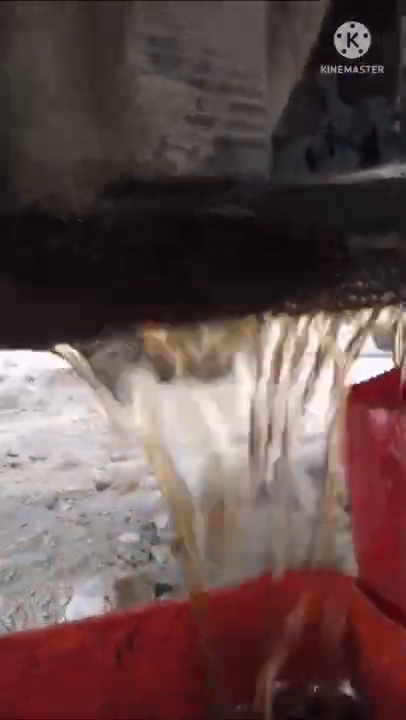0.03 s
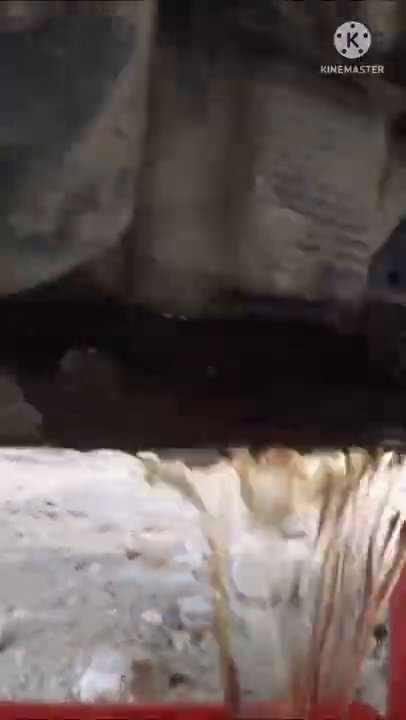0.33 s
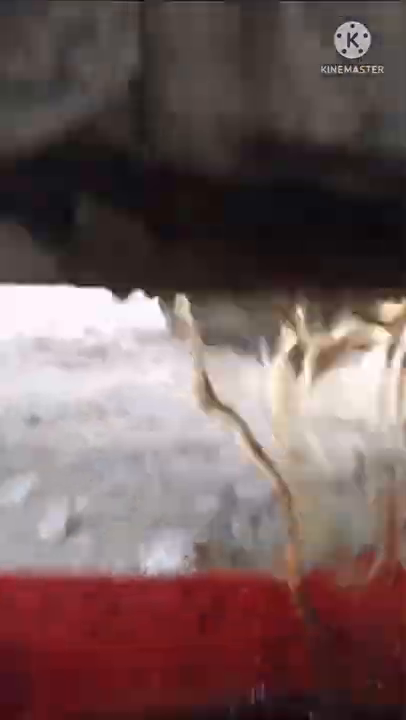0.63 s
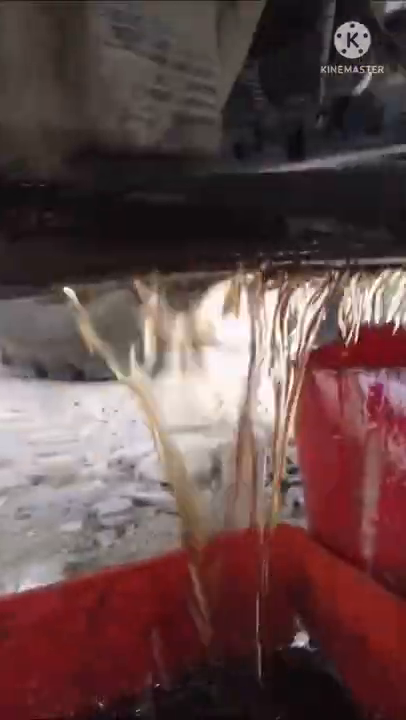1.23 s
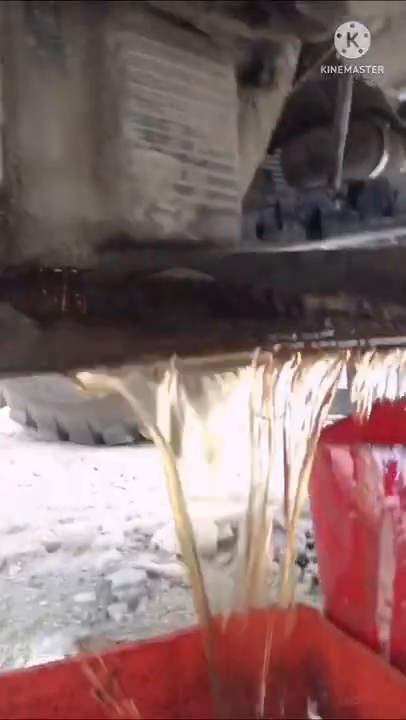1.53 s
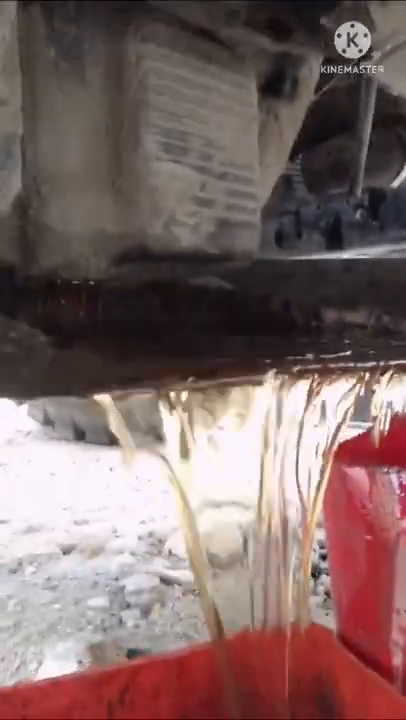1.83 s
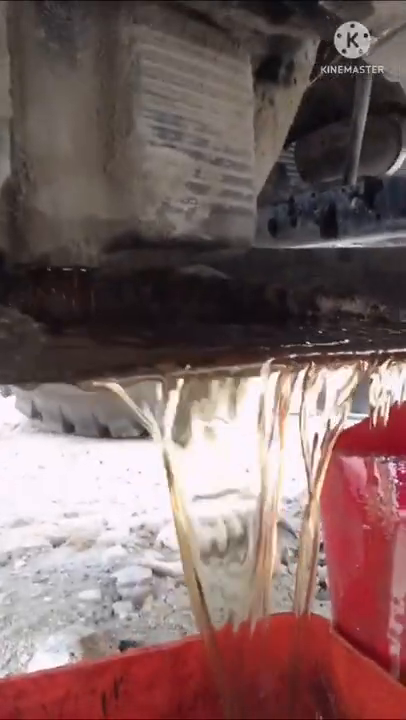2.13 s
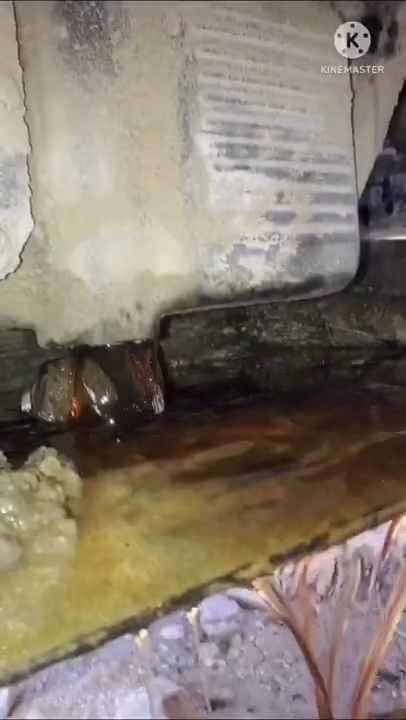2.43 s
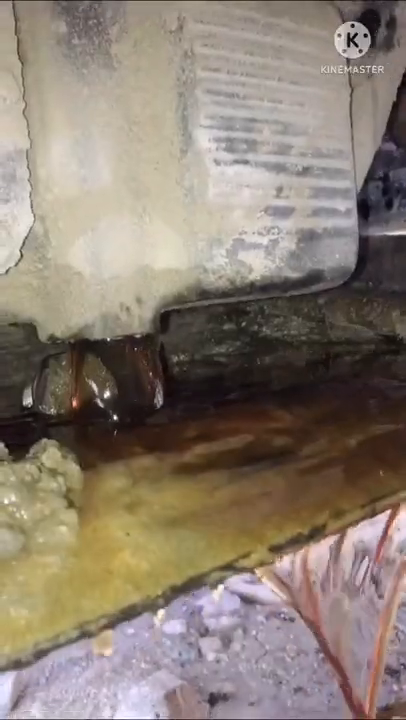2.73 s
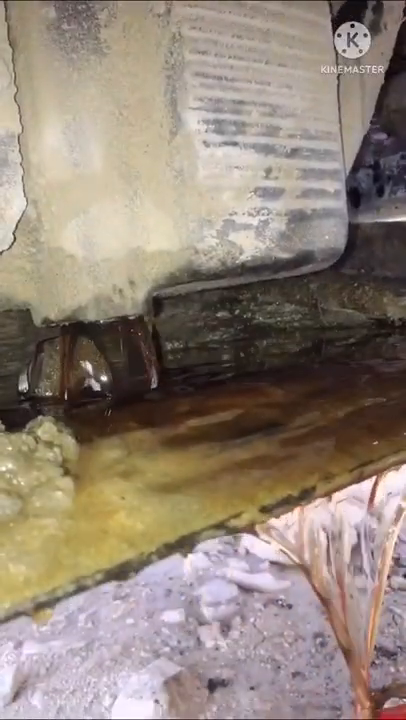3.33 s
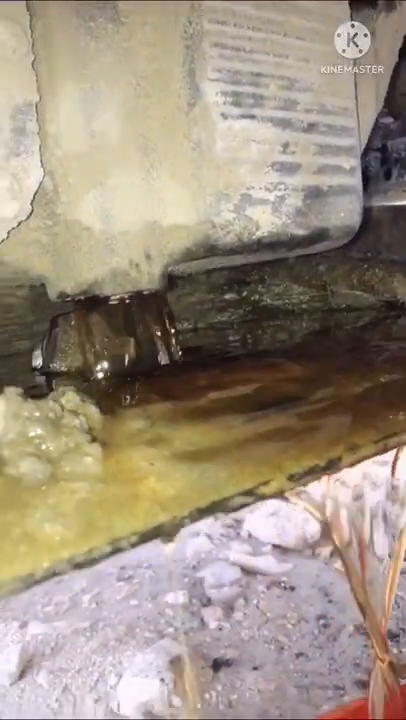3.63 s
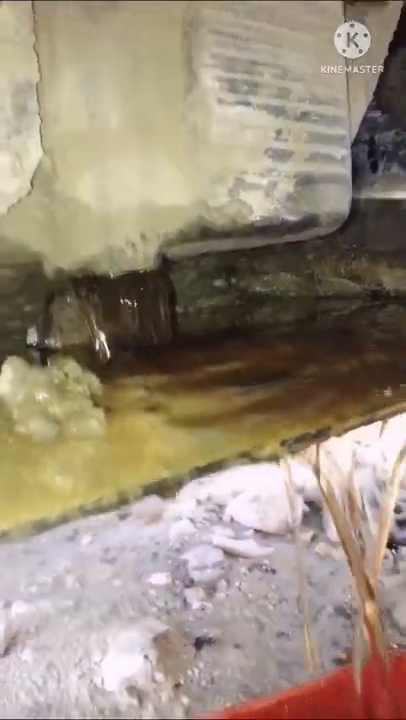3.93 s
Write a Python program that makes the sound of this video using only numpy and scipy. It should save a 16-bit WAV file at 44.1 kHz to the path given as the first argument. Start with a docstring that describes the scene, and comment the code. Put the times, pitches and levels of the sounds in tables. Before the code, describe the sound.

Oil pours into a part-filled plastic tub, gurgling and splattering, strongest in the first second and then gradually thinning until 4 seconds. An engine idles nearby outdoors over a low rumble. A loud, sharp knock sounds close at 0.8 seconds, and a lighter one with a faint ring at 2.2. Dull microphone bumps come at 1.2, 1.8 and 2.2. All sound cuts out for an instant at 2.3.

```python
"""Oil pours in several streams off a machine's belly plate into a part-filled plastic tub.
Slugs slap the pool, bubbles ring briefly and droplets patter; the tub's hollow rings with them.
An engine idles nearby in the open air, over a low rumble. Two sharp knocks, the second with a thin
ring, and three dull bumps sound close to the microphone. The pour gradually thins, and all sound
drops out briefly at 2.3 s."""
import sys
import numpy as np
from scipy import signal
from scipy.fft import rfft, irfft, next_fast_len
from scipy.io import wavfile
from scipy.ndimage import uniform_filter1d, map_coordinates

SR = 44100
rng = np.random.default_rng(int(sys.argv[2]) if len(sys.argv) > 2 else 0)


def generate_wav(signal):
    """Clip the signal to [-1, 1] and save it as 16-bit WAV at the path in sys.argv[1]."""
    frames = np.transpose(np.atleast_2d(signal))
    scaled = np.clip(frames, -1, 1) * 32767
    pcm = np.round(scaled).astype(np.int16)
    wavfile.write(sys.argv[1], SR, pcm)


N = 176400


def amp(db):
    """Decibels to gain."""
    return 10 ** (np.asarray(db) / 20)


def unit(x):
    """Scale to rms 1."""
    return x / np.sqrt(np.mean(x ** 2) + 1e-20)


def curves(rows):
    """One value per sample for each column after the time."""
    times, *columns = np.transpose(rows)
    return [np.interp(np.arange(N) / SR, times, column) for column in columns]


def wobble(rate, size=N, knots=1024):
    """A smooth random curve, rate knots a second."""
    return map_coordinates(rng.standard_normal(knots), [np.arange(size) * rate / SR], mode="wrap")


def add(track, start, sound):
    """Mix a sound in at start seconds."""
    i = max(0, round(start * SR))
    track[i:i + len(sound)] += sound[:max(0, N - i)]


def swell(u):
    """Quick rise to 1 at u = 1, then an exponential fall."""
    return u * np.exp(1 - u)


def lowpass(x, hz):
    """Zero-phase low-pass; x minus this is the treble."""
    return signal.sosfiltfilt(signal.butter(2, hz, fs=SR, output="sos"), x)


def colour(x, points):
    """Minimum-phase filter through (f/Hz, level/dB) points."""
    size = 2 * next_fast_len(N // 2 + 8192)
    hz, db = np.transpose(points)
    gain = amp(np.interp(np.log(np.fft.rfftfreq(size, 1 / SR) + 1), np.log(hz), db))
    cepstrum = irfft(np.log(gain))
    cepstrum[1:size // 2] *= 2
    cepstrum[size // 2 + 1:] = 0
    return irfft(rfft(x, size) * np.exp(rfft(cepstrum)), size)[:N]


def patchy(x, depth_db=2.9):
    """Random, short-lived resonances give every splash its own colour; rms 1."""
    spectrum = signal.stft(x, nperseg=256)[2]
    patches = uniform_filter1d(rng.standard_normal(spectrum.shape), size=4, axis=0)
    patches = uniform_filter1d(patches, size=7, axis=1)
    return unit(signal.istft(spectrum * amp(depth_db * unit(patches)), nperseg=256)[1][:N])


def grains(per_s, lo_hz, hi_hz, cycles, spread_db, size):
    """A random cloud of tiny ringing bubbles, each size samples long; rms 1."""
    onset, pitch, faintness, stretch = np.hsplit(rng.random((int(per_s * N / SR), 4)), 4)
    hz = lo_hz * (hi_hz / lo_hz) ** pitch
    t = np.arange(size) / SR
    gain = amp(-spread_db * np.log(.02 + .98 * faintness)) * (hz / hi_hz) ** 1.5
    rings = gain * swell(t * hz / (cycles * (.5 + stretch))) * np.sin(2 * np.pi * hz * t)
    samples = (onset * N).astype(int) + np.arange(size)
    return unit(np.bincount(samples.ravel(), rings.ravel(), N)[:N])


# Slugs landing in the tub: t/s, length/s, slap level/dB, spray level/dB
SLUGS = [(-0.002,0.013,-28,-40),(0.026,0.019,-35,-37.5),(0.112,0.0073,-29,-30.5),(0.175,0.044,-28.5,-34),(0.228,0.046,-32.5,-55),(0.278,0.024,-32.5,-47),(0.321,0.0078,-34,-28.5),(0.346,0.014,-44,-37),(0.378,0.039,-31.5,-43),
         (0.457,0.025,-33,-37.5),(0.536,0.012,-46,-34.5),(0.552,0.0089,-29,-35.5),(0.573,0.022,-34,-45),(0.607,0.06,-31.5,-39.5),(0.715,0.032,-29,-35),(0.819,0.018,-30,-41.5),(0.925,0.028,-26.5,-30.5),(0.945,0.01,-35,-39),(0.98,0.038,-26,-34.5),
         (1.083,0.016,-40,-40),(1.11,0.03,-37.5,-71),(1.132,0.025,-34.5,-36.5),(1.155,.008,-51,-46),(1.173,0.0066,-30,-52),(1.199,0.055,-30.5,-50),(1.231,0.011,-31.5,-32),(1.293,0.013,-43,-32),(1.324,0.039,-34.5,-52),(1.362,0.028,-54,-43),(1.427,0.023,-33,-40),(1.483,0.0084,-40,-38),(1.514,0.0037,-38,-37),
         (1.558,0.049,-35.5,-39.5),(1.682,0.022,-31.5,-42),(1.711,0.0065,-59,-40),(1.727,0.024,-58,-41.5),(1.812,0.0099,-35.5,-47),(1.849,0.013,-45,-40),(1.878,0.0023,-50,-45),(2.049,0.012,-29.5,-43.5),(2.181,0.012,-33,-66),(2.274,0.034,-37,-69),(2.25,0.0083,-40,-44),(2.297,0.0076,-41.5,-43),
         (2.416,0.013,-30,-40),(2.44,0.0031,-27,-49),(2.472,0.025,-31,-63),(2.57,0.014,-32,-49),(2.589,0.014,-36.5,-45),(2.664,0.0079,-31.5,-38.5),(2.801,0.007,-51,-37.5),(2.927,0.0093,-36,-33.5),(3.057,0.0041,-37,-36),(3.107,0.0028,-35,-36),(3.187,0.031,-40,-44),(3.209,0.014,-31,-33.5),(3.298,0.013,-34,-49),(3.573,0.019,-41.5,-58),(3.609,0.0061,-43.5,-62),(3.674,0.011,-41.5,-47),(3.854,0.051,-44,-60)]
# Single flecks landing with a bright tick: t/s, level/dB
FLECKS = [(.054,-35),(.145,-44),(0.361,-28),(.438,-42),(.478,-44),(.702,-51),(1.217,-39),(1.304,-36),(1.439,-30),(1.522,-47),(1.705,-34.5),(1.76,-38),(1.824,-39),(1.99,-41),(2.07,-45),(2.24,-39),
          (2.612,-41),(2.878,-37),(2.897,-39),(3.138,-31.5),(3.231,-35),(3.297,-41),(3.777,-42),(3.887,-42),(3.946,-41)]
# Spectra of the slap at the pool and the spray above it: f/Hz, level/dB
SLAP_SPECTRUM = [(180, -27.5), (300, 19), (318, 20), (460, 10.5), (695, 13), (812, -12), (923, 10.5),
                 (1360, 0.5), (1500, 6.5), (1800, -0.5), (2570, 1.5), (4290, -11.5), (4810, -27.5),
                 (6130, -29), (9000, -37), (11700, -20), (19800, -120)]
SPRAY_SPECTRUM = [(2500,-7),(4200,9),(4850,0),(5700,5.5),(7000,2),(8000,-1.5),(9400,3),(10300,-5),(11400,-1.5),(13500,-5.5),(16000,-16.5)]


def splats(brightening=0.12, neutral_db=-24.5, mist_hz=10600, tick_rise_s=.00066, tick_fall_s=.0017):
    """Slugs of oil slap the pool and throw up spray, finer the harder they land; stray flecks tick."""
    slap_gain, spray_gain, mist_gain = np.zeros((3, N))
    t = np.arange(SR // 6) / SR
    for start, length, slap_db, spray_db in SLUGS:
        shape = swell(t / (0.26 * length)) ** 0.8  # the power blunts the peak
        add(slap_gain, start, amp(slap_db) * shape)
        add(spray_gain, start, amp(spray_db) * shape)
        add(mist_gain, start, amp(spray_db + brightening * (spray_db - neutral_db)) * shape)
    for start, db in FLECKS:
        tick = amp(db) * (1 - np.exp(-t / tick_rise_s)) * np.exp(-t / tick_fall_s)
        add(spray_gain, start, tick)
        add(mist_gain, start, 2 * tick)
    slap = grains(per_s=7000, lo_hz=328, hi_hz=6430, cycles=0.71, spread_db=2, size=400)
    slap = patchy(colour(slap, SLAP_SPECTRUM))
    spray = grains(per_s=14000, lo_hz=3110, hi_hz=16200, cycles=4.2, spread_db=2, size=100)
    spray = patchy(colour(spray, SPRAY_SPECTRUM))
    coarse = lowpass(spray, mist_hz)
    return slap_gain * slap + spray_gain * coarse + mist_gain * (spray - coarse)


def spits(per_s=110, lo_hz=3300, hi_hz=10000, spread_db=3.2, rise_s=.0014):
    """Tiny droplets spit off the pool, each with its own rough pitch; rms 1."""
    out, t = np.zeros(N), np.arange(SR // 80) / SR
    for k, (late, faintness, pitch) in enumerate(rng.random((int(per_s * N / SR), 3))):
        hz = lo_hz * (hi_hz / lo_hz) ** pitch
        roughness = wobble(hz / 3, len(t), knots=64)
        envelope = amp(-spread_db * np.log(faintness + .04)) * swell(t / rise_s)
        add(out, (k + late) / per_s, envelope * roughness * np.sin(2 * np.pi * hz * t))
    return unit(out)


# Streams running off the plate into the tub: t/s, gurgle level/dB, fizz level/dB
FLOW = [(0,-35.5,-45.5),(.3,-35.5,-39.5),(.5,-36,-46.5),(.68,-31,-44.5),(.88,-31.5,-48),(1.15,-38,-48.5),(1.27,-38,-50.5),(1.45,-39,-44.5),(1.62,-39.5,-53.5),(1.8,-40,-57),(2.12,-45,-56.5),(2.38,-44,-51),(2.53,-39,-51.5),(2.74,-45,-62),(3.0,-41,-52.5),(3.28,-38,-53),(3.47,-45.5,-62),(4,-46.5,-59)]
# Spectra where the streams meet the pool: f/Hz, level/dB
GURGLE_SPECTRUM = [(200,-26),(420,6),(600,6),(780,6),(920,6.5),(1150,2),(1470,1),(1800,-1.5),(2250,-4.5),(2800,-10),(3300,-12),(4300,-24.5),(4900,-50),(7000,-19)]
FIZZ_SPECTRUM = [(2500,-9),(4200,10.5),(4850,-3),(5800,5.5),(8000,-7.5),(9400,-4.5),(10300,-10.5),(11400,-6.5),(16000,-8)]


def pour(darkening=0.35, dark_hz=2690, spit_db=-2.5):
    """Unbroken streams gurgle, fizz and spit, fluttering as they land; a thinner pour is darker."""
    gurgle_db, fizz_db = curves(FLOW)
    flutter = wobble(45)
    gurgle = grains(per_s=2600, lo_hz=350, hi_hz=5000, cycles=2.3, spread_db=2.4, size=900)
    gurgle = patchy(colour(gurgle, GURGLE_SPECTRUM))
    dull = lowpass(gurgle, dark_hz)
    gurgle = dull + amp(darkening * (fizz_db - fizz_db.mean())) * (gurgle - dull)
    fizz = grains(per_s=6000, lo_hz=3500, hi_hz=16000, cycles=2.2, spread_db=2.1, size=160)
    patter = amp(spit_db) * spits() + patchy(colour(fizz, FIZZ_SPECTRUM))
    return amp(gurgle_db + 1.48 * flutter) * gurgle + amp(fizz_db + 0.79 * flutter) * patter


# Resonances of the tub's hollow, under the machine: f/Hz, width/Hz, level/dB
TUB_MODES = [(916,24,3),(1509,15.4,9.5),(2240,11,3),(2635,19,8.5),(3777,33,8),(4430,33,5.5),(5540,150,-31)]


def tub(oil, ring_db=-7, echo_db=-13, echo_t60_s=.03):
    """The tub rings with the oil, and the metal overhead throws back a short scatter of echoes."""
    t = np.arange(SR // 8) / SR
    ring = np.zeros(len(t))
    for hz, width, db in TUB_MODES:
        decay = 2 * np.pi * width / SR * np.exp(-np.pi * width * t)
        ring += amp(db) * decay * np.cos(2 * np.pi * hz * t)
    echo = rng.standard_normal(len(t)) * amp(-60 * t / echo_t60_s) * (t > .002)
    response = amp(ring_db) * ring + amp(echo_db) * echo / np.linalg.norm(echo)
    return oil + signal.fftconvolve(oil, response)[:N]


# Engine idling nearby: multiple of the firing rate, rms level/dB
ENGINE_ORDERS = [(1,-40.5),(2,-30.5),(3,-36.5),(4,-38),(5,-56),(5.33,-51),(6,-49.5),(7,-47),(8,-49),(9,-53),(10,-56.5)]


def engine(firing_hz=37.3, drift=.004, waver_db=3.6):
    """The firings hum in wavering tones at multiples of their slightly drifting rate."""
    firings = np.cumsum(firing_hz * (1 + drift * wobble(5.17))) / SR
    hum = np.zeros(N)
    for order, db in ENGINE_ORDERS:
        peak = np.sqrt(2) * amp(db + waver_db * wobble(7))
        hum += peak * np.sin(2 * np.pi * (order * firings + rng.random()))
    return hum


# Low rumble beneath the engine: t/s, level/dB
RUMBLE_LEVEL = [(0,-24),(.8,-24),(1.5,-28),(1.85,-25),(2.25,-28.5),(2.42,-29.5),(2.8,-29.5),(4,-29)]
# Spectra of the rumble and the open air around the microphone: f/Hz, level/dB
RUMBLE_SPECTRUM = [(15,-22),(28,-5.5),(42,4),(62,-1),(90,-1.5),(125,-7.5),(170,-17),(250,-35),(400,-44.5),(1500,-110)]
AIR_SPECTRUM = [(90,-11),(200,7),(300,-3.5),(500,-9),(1000,-11.5),(2300,-19.5),(5000,-38),(10000,-35),(16000,-48)]


def background(air_db=-40):
    """An uneven rumble and the steady rush of the open air."""
    rumble_db = curves(RUMBLE_LEVEL)[0] + wobble(10.09)
    rumble = unit(colour(rng.standard_normal(N), RUMBLE_SPECTRUM))
    air = unit(colour(rng.standard_normal(N), AIR_SPECTRUM))
    return amp(rumble_db) * rumble + amp(air_db) * air


# Single bubbles ringing out of the pool: t/s, f/Hz, level/dB, length/s
POOL_BUBBLES = [(0.011, 4020, -12, 0.00072), (0.0113, 5620, -14.5, 0.0021), (0.0095, 6600, -28, 0.0024),
                (0.038, 4400, -23, 0.0016), (0.113, 1530, -28, 0.007), (0.176, 690, -29.5, 0.0087),
                (0.1933, 7000, -19.5, 0.0025), (0.1937, 4030, -18.5, 0.0012), (0.277, 6170, -21.5, 0.0024),
                (0.319, 430, -28, 0.0054), (0.3633, 2860, -23, 0.0018), (0.3694, 1448, -24, 0.0095),
                (0.3727, 3010, -20, 0.00093), (0.39, 6500, -24.5, 0.0016), (0.475, 3510, -19.5, 0.00094),
                (0.582, 534, -19, 0.0012), (0.6332, 1020, -21.5, 0.0048), (0.6369, 6170, -23.5, 0.0025),
                (0.6382, 448, -20, 0.0042), (0.72, 2180, -29, 0.009), (0.9124, 2220, -23.0, 0.0057),
                (0.933, 1410, -18, 0.0018), (0.947, 2760, -30, 0.0042), (0.996, 2120, -29, 0.0037),
                (1.12, 1540, -32, 0.008), (1.149, 4240, -24, 0.0013), (1.2947, 2640, -21, 0.00079),
                (1.432, 502, -27.5, 0.0077), (1.6015, 4180, -24.5, 0.005), (1.675, 1474, -30.5, 0.0098),
                (1.691, 1410, -27.5, 0.0043), (2.025, 2730, -33, 0.0071), (1.855, 446, -25.5, 0.0058),
                (2.263, 5620, -22, 0.0026), (2.401, 5730, -33.5, 0.0032), (2.416, 824, -26, 0.0048),
                (2.424, 897, -27.5, 0.0076), (2.451, 910, -26.0, 0.0023), (2.459, 3790, -24, 0.0032),
                (2.4614, 825, -27, 0.0036), (2.4739, 3800, -21.5, 0.0027), (2.547, 3700, -32.0, 0.0039),
                (2.594, 976, -23, 0.0019), (2.654, 2260, -31.5, 0.0042), (2.6642, 3615, -21, 0.0023),
                (2.998, 9100, -33, 0.0022), (3.008, 6060, -35, 0.0036), (3.022, 5680, -26, 0.0043),
                (3.088, 3910, -25.5, 0.0041), (3.1444, 984, -22, 0.0046), (3.11, 560, -28, 0.0032),
                (3.1856, 2250, -28, 0.0042), (3.195, 2620, -31, 0.0029), (3.2142, 9370, -22.5, 0.0028),
                (3.305, 1560, -34, 0.006), (3.597, 766, -24.5, 0.0017), (3.662, 1454, -28.5, 0.0027),
                (3.8444, 1520, -28.5, 0.0014), (3.8534, 2290, -23, 0.0012)]


def bubbles(chirp=.004, wash_db=-8, wash_rise_s=.0036, wash_width=.55):
    """Each bubble rings briefly, damped by the thick oil, and leaves a rough wash around its pitch."""
    out, t = np.zeros(N), np.arange(SR // 20) / SR
    for start, hz, db, length in POOL_BUBBLES:
        age = t / (0.39 * length)  # in rise times
        phase = 2 * np.pi * np.cumsum(hz * (1 + chirp * (np.minimum(age, 10) - 1))) / SR
        roughness = wobble(hz * wash_width, len(t), knots=256)
        wash = amp(wash_db) * swell(t / wash_rise_s) * roughness * np.cos(phase)
        add(out, start, amp(db) * (swell(age) * np.sin(phase) + wash))
    return out


# Knocks close to the microphone: t/s, peak level/dB
CLOSE_KNOCKS = [(.7595,0),(2.155,-15.5)]
# Modes of each knock: f/Hz, level/dB, t60/s
KNOCK_RING = [(218,-5,0.01),(417,-9.5,0.017),(1000,-4.5,0.011),(1445,-4,0.0055),(2020,-2.5,0.0041)]


def knocks(attack_s=0.00019):
    """Each dry knock sets off a few modes that die within milliseconds."""
    out, t = np.zeros(N), np.arange(SR // 5) / SR
    ring = sum((-1) ** k * amp(db - 60 * t / t60) * np.sin(2 * np.pi * hz * t)
               for k, (hz, db, t60) in enumerate(KNOCK_RING))
    ring *= 1 - np.exp(-t / attack_s)
    for start, db in CLOSE_KNOCKS:
        add(out, start, amp(db) * ring / np.abs(ring).max())
    return out


# Bumps right against the microphone: t/s, f/Hz, level/dB
MIC_BUMPS = [(1.1755,64,-9),(1.812,42,-21),(2.156,55,-20)]


def bumps(rise_s=0.01008):
    """Each bump is a dull thud, a few cycles of one low tone."""
    out, t = np.zeros(N), np.arange(SR // 5) / SR
    for start, hz, db in MIC_BUMPS:
        add(out, start, amp(db) * swell(t / rise_s) * np.sin(2 * np.pi * hz * t))
    return out


# Thin ring around the second knock: t/s, level/dB
RING_LEVEL = [(2.07,-63),(2.16,-42.5),(2.22,-42),(2.31,-44),(2.34,-94)]
# Its tones: f/Hz, level/dB
RING_PARTIALS = [(2643,-3.5),(3085,-13)]


def thin_ring():
    """Two high, wavering tones, very faint at first, swell with the second knock and die away."""
    t = np.arange(N) / SR
    tones = sum(amp(db) * (1 + .5 * wobble(150)) * np.sin(2 * np.pi * hz * t)
                for hz, db in RING_PARTIALS)
    return amp(curves(RING_LEVEL)[0]) * tones


def scene(bubble_db=-1, splat_db=-1, pour_db=-2):
    """One microphone hears the oil in its tub, the engine nearby and the knocks and bumps up close."""
    oil = amp(bubble_db) * bubbles() + amp(splat_db) * splats() + amp(pour_db) * pour()
    return (tub(oil) + engine() + background() + knocks() + bumps() + thin_ring())[None]


def record(dry, dropout_s=(2.313, 2.361), top_hz=16100):
    """The microphone's signal drops out briefly, clips at full scale and loses its highest treble."""
    t = np.arange(N) / SR
    live = (t < dropout_s[0]) | (t > dropout_s[1])
    gate = uniform_filter1d(1.0 * live, size=40)
    clipped = np.clip(dry * gate, -1, 1)
    size = next_fast_len(N + SR // 2)
    passband = np.fft.rfftfreq(size, 1 / SR) < top_hz
    return irfft(rfft(clipped, size) * passband, size)[..., :N]


dry = scene()
out = record(dry)
generate_wav(out)
```